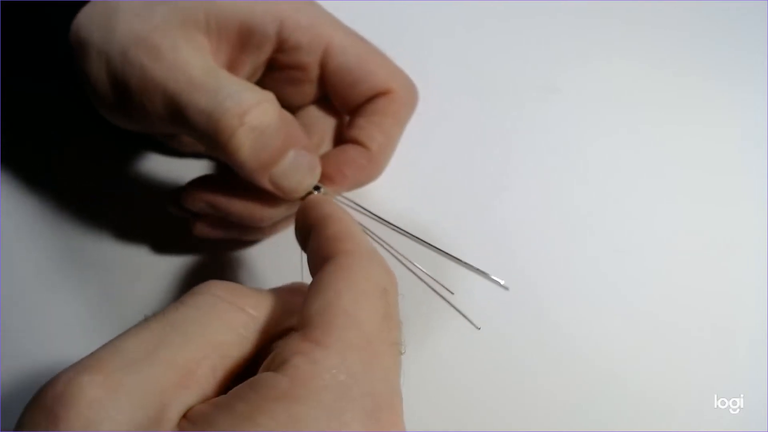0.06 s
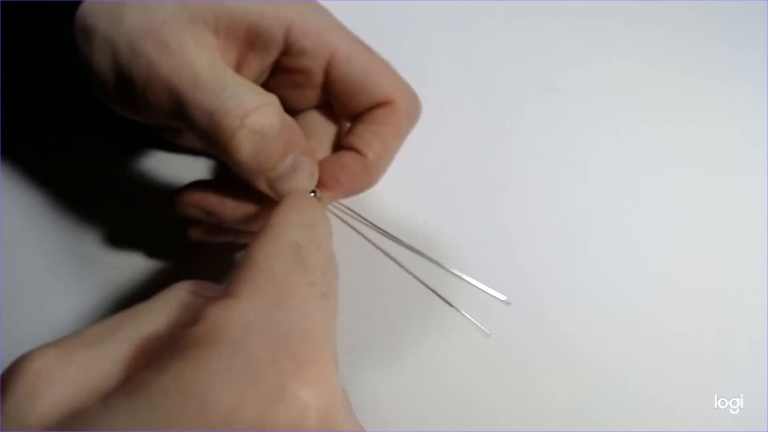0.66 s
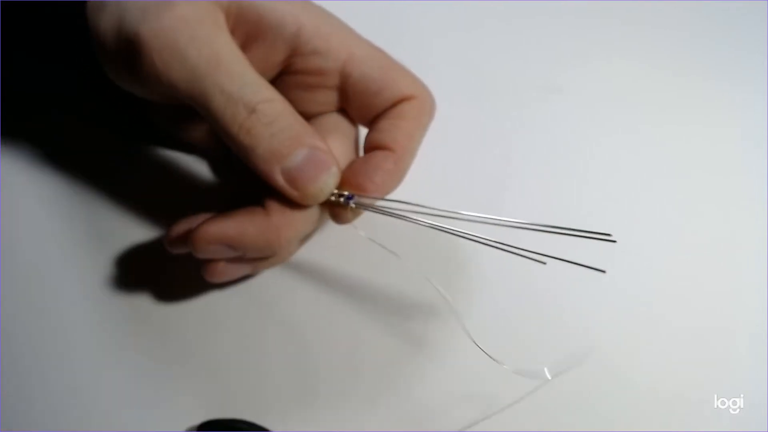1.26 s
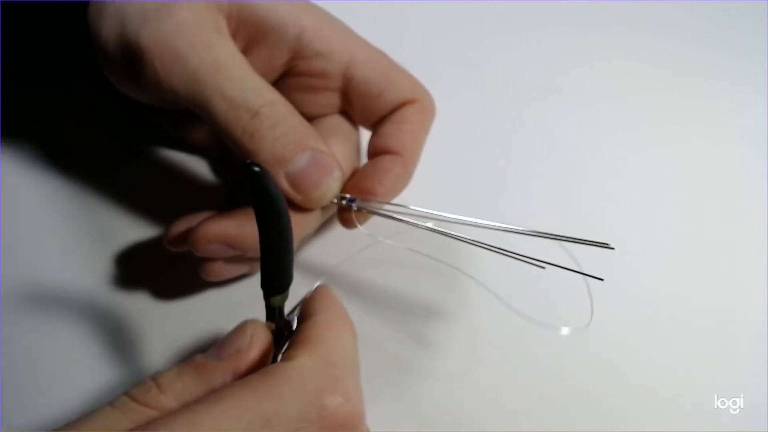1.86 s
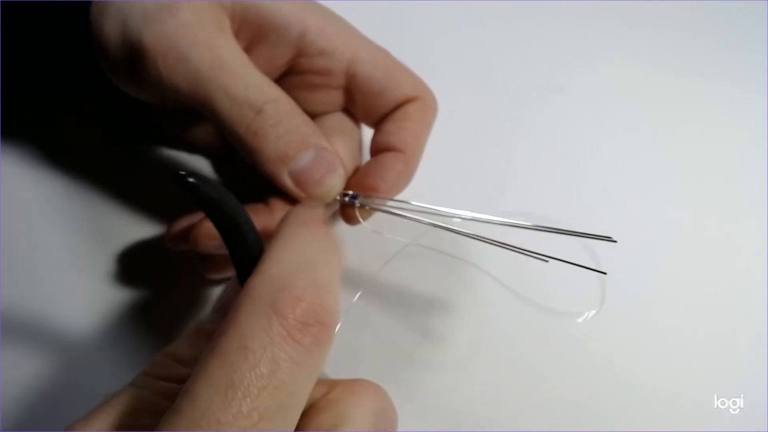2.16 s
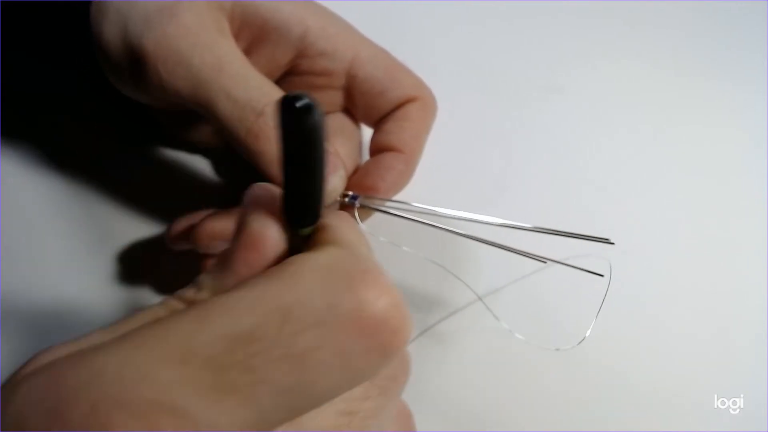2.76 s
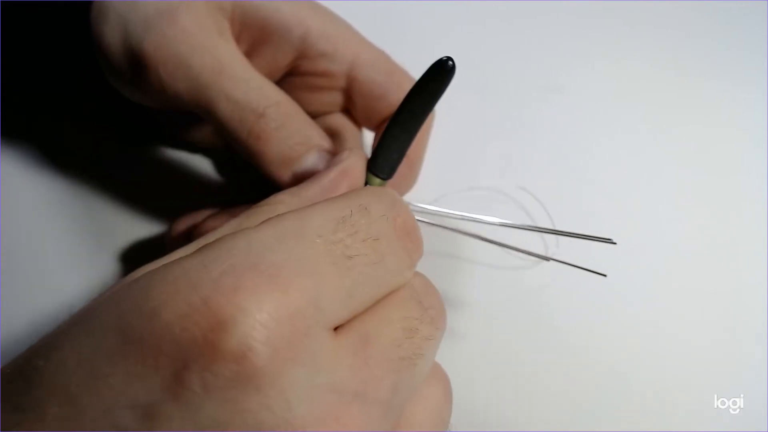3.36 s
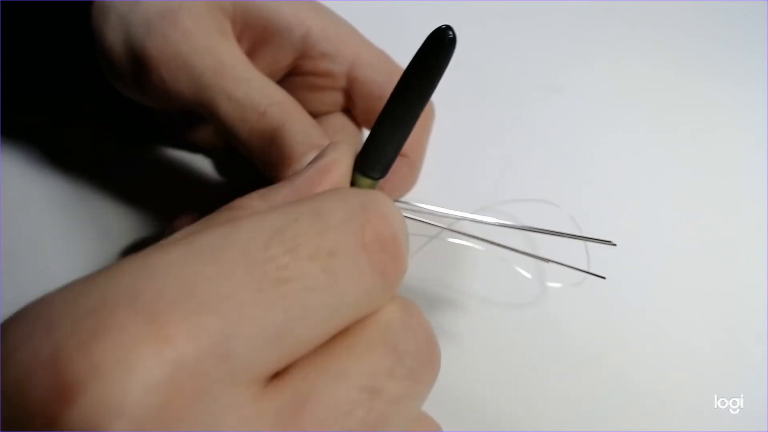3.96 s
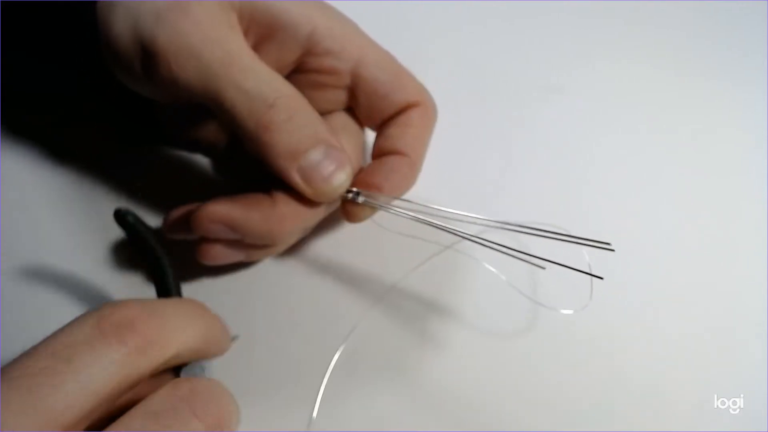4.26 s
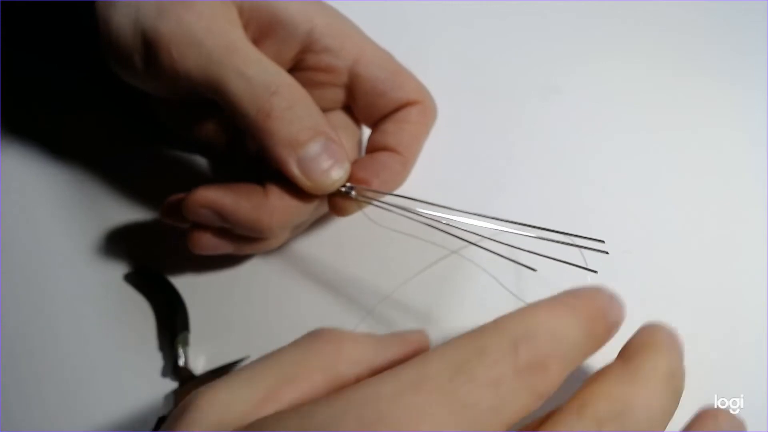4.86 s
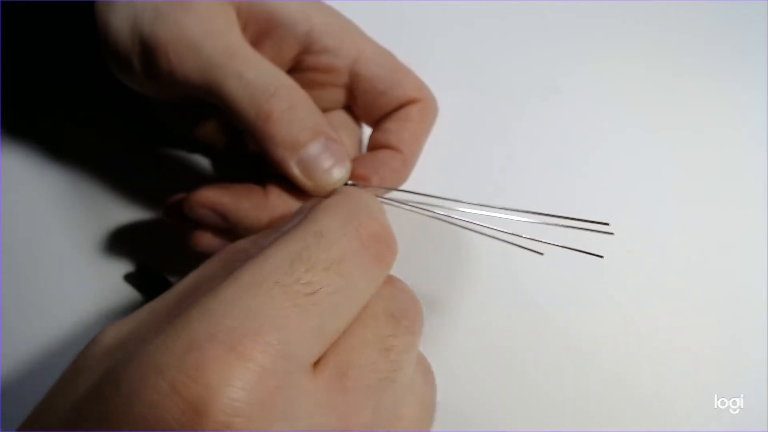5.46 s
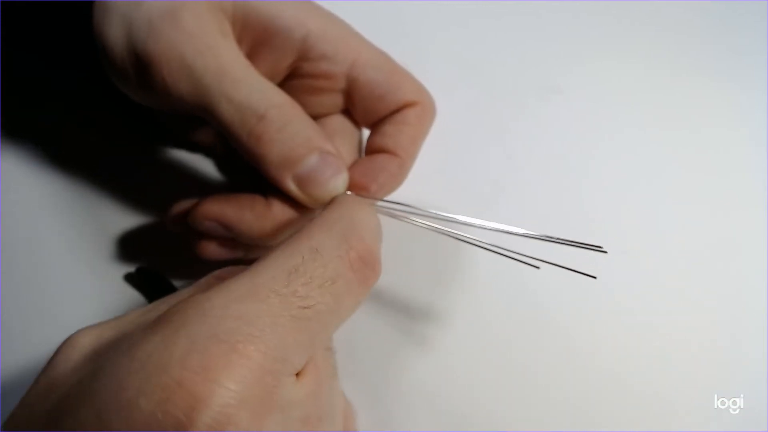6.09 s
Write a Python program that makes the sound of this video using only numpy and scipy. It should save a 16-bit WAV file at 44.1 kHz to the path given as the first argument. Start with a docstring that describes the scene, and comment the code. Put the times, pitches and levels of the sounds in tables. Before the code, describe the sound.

Two microphones sit close to the hands at a desk in a small quiet room, with a low hum and faint air throughout. Thin wire is wrapped around a bundle of stiff wires in short, faint hisses and rasps, with a sharp little metal tick near 0.9 seconds. From about 1.1 to 1.6 seconds small pliers are dragged off the desk with soft bumps, scrapes and tiny squeaks. Around 2.2 seconds a thin squeak and a few clicks lead into the strongest pull of wire, a bright hiss that fades by 2.6 seconds. Fainter strokes come near 3 and 3.8 seconds. A tick and a soft bump at 4.2 seconds precede the loudest sound at 4.4 seconds: the pliers are put down with one sharp knock that briefly rings the desk top. A few more soft strokes of wire follow from 4.8 to 5.4 seconds, then it goes nearly quiet.

```python
"""A desk in a small quiet room, two microphones close to the hands; low hum and faint air throughout.
Thin wire is wrapped round a bundle of stiff wires just above the desk: it hisses through the fingertips,
rasps and ticks against the bundle. Early on, small pliers are dragged off the desk. The strongest pull
of wire comes at 2.3 s. At 4.4 s the pliers are put down with one sharp knock that rings the desk top,
and a few more strokes of wire follow."""
import sys
import numpy as np
from scipy import signal
from scipy.fft import rfft, irfft, next_fast_len
from scipy.io import wavfile

SR = 44100
rng = np.random.default_rng(int(sys.argv[2]) if len(sys.argv) > 2 else 0)


def int16_out(signal):
    """Quantize to a 16-bit WAV file."""
    q = np.round(np.clip(np.atleast_2d(signal).T, -1, 1) * 32767)
    wavfile.write(sys.argv[1], SR, q.astype(np.int16))


N = 274743

# pulls of wire through the fingers:
# (time [s], length [s], hiss level [dB], rasp level [dB], sag by the end [dB], free-length ring [Hz])
WIRE_STROKES = [(0.397, 0.014, -71.5, -82, 0, 7400), (0.61, .05, -89, -86, 0, 3400),
                (0.697, .012, -70, -68, 2, 3400), (0.785, .07, -60.5, -56, 0, 3400),
                (0.874, .022, -52, -54, 11, 6500), (0.933, .012, -59, -64, 0, 6200),
                (1.048, .015, -76, -75, 1, 3200), (1.118, .11, -68.5, -64.5, 7, 3700),
                (1.304, .02, -71, -73.5, 1, 3440), (1.372, .095, -68, -65.5, 6, 2400),
                (1.515, .095, -68, -70.5, 3, 6200), (1.86, .015, -80, -78, -1.5, 3550),
                (1.893, .014, -68.5, -72, 1, 3500), (2.2, 0.032, -59, -59, -1, 3420),
                (2.28, 0.12, -43.5, -50, 4, 6100), (2.425, .185, -52.5, -64, 21, 5580),
                (2.942, .06, -59, -67.5, 2, 5450), (3.035, .095, -66, -78, 2, 5460),
                (3.257, .02, -77.5, -91, 2, 5400), (3.405, .025, -91, -88, 1, 5360),
                (3.67, 0.019, -84, -82.5, 5, 5430), (3.788, .03, -52.5, -62, 3, 5460),
                (3.865, .11, -58, -69.5, 5, 5460), (4.232, .075, -63, -59.5, 14, 3400),
                (4.81, .15, -61, -70.5, -2, 5200), (5.01, .10, -58.5, -69.5, 3, 4900),
                (5.139, 0.11, -55.5, -64, 0, 4790), (5.28, .08, -61, -71.5, 9, 4790),
                (5.494, 0.034, -83, -92, 2.5, 4630), (6.2, .01, -62, -82, 0, 6800)]
# wire on fingertips: (frequency [Hz], level [dB])
HISS_SPECTRUM = [(1300, -29.5), (2400, -16.5), (3200, -3.5), (3700, -1), (4300, -0.5), (4850, -3),
                 (5150, -1.5), (5550, -3), (6500, -5), (7400, -3), (8300, -14), (10000, -14.5),
                 (13000, -18.5), (16000, -27)]
# wire on metal or desk: (frequency [Hz], level [dB])
RASP_SPECTRUM = [(50, -24.5), (150, -11), (400, -7), (800, -10), (1200, -8), (1900, -3), (2500, -5.5),
                 (3100, 2), (4000, -7), (7000, -24.5)]
# the rubbed wire's own ringing: (frequency [Hz], width [Hz], level against the plain hiss [dB])
WIRE_MODES = [(3760, 85, -4.5), (4830, 230, 1.5), (5570, 460, 4.5), (6270, 200, -2), (9485, 300, -3.5)]
# the wire sings where it skids: (time [s], length [s], start pitch [Hz], end pitch [Hz], level [dB])
WIRE_SQUEAKS = [(0.685, 0.035, 1130, 1087, -63), (0.80, 0.047, 3400, 3270, -62),
                (0.985, .045, 3100, 3150, -70.5), (1.29, .04, 3560, 3230, -70),
                (1.37, 0.07, 2200, 2430, -65.5), (1.376, .041, 1080, 1204, -66),
                (1.445, .03, 2300, 2250, -71), (1.496, 0.075, 2607, 1637, -62),
                (1.505, .045, 3300, 2800, -58.5), (2.175, 0.072, 3360, 3460, -53),
                (2.202, .036, 1915, 1730, -54), (2.277, 0.11, 3417, 3420, -60),
                (2.579, 0.043, 3310, 3360, -73.5), (5.014, 0.035, 4900, 4660, -54.5),
                (5.241, 0.038, 3035, 2800, -60.5)]
# metal touching metal: (time [s], level [dB], ring [Hz], chatter t60 [s])
METAL_TICKS = [(0.696, -54.5, 2420, 0.014), (0.7662, -46, 1890, .04), (0.7661, -46, 3110, .024),
               (0.791, -62.5, 2020, 0.014), (0.857, -29.5, 5330, 0.011), (0.928, -46, 2880, .006),
               (1.131, -57.5, 2220, 0.044), (1.356, -58.5, 1910, .02), (1.586, -43.5, 3125, .015),
               (1.5871, -40.5, 6120, .0043), (1.895, -55.5, 3290, .022), (2.189, -43, 3300, 0.011),
               (2.206, -38.5, 2053, .019), (2.2564, -24.5, 4600, .0047), (2.267, -30.5, 4400, .014),
               (2.2687, -36, 1940, .012), (2.376, -49, 1900, 0.028), (4.2217, -33.5, 3500, .0085),
               (4.2598, -43.5, 2200, .011), (4.425, -41, 4650, .008), (5.033, -50, 4960, 0.018)]
# blows on the desk, low cut-off for flesh, high for steel:
# (time [s], level [dB], contact cut-off [Hz], hand damping t60 [s])
DESK_BLOWS = [(0.696, -51, 700, 0.63), (0.768, -43.5, 810, 0.22), (1.1107, -36, 200, 0.14),
              (1.119, -35, 100, 0.11), (1.132, -30, 85, 0.17), (1.206, -50, 355, .3),
              (1.358, -50.5, 400, 0.24), (1.373, -46.5, 250, 0.37), (1.392, -46, 160, 0.4),
              (1.445, -51, 157, .3), (2.256, -47, 601, .2), (4.2238, -31, 150, .6), (4.233, -44.5, 130, .3),
              (4.261, -38, 180, 0.42), (4.4279, -26, 900, .3), (4.4333, -6.5, 2400, 1.8),
              (4.89, -56, 300, .4)]
# what the desk top rings with: (frequency [Hz], level [dB], t60 [s])
DESK_MODES = [(80, -18.5, 0.49), (126, -6.5, 0.18), (165.4, -8, 0.16), (191.8, -8.5, 0.17),
              (209, -9.5, 0.36), (264, -8.5, 0.091), (350, -0.5, 0.049), (385, 0, 0.022), (405, -11.5, .18),
              (538, -12.5, 0.051), (624, -12, 0.19), (804, -13.5, 0.18), (855, -8, .18), (964, -6.5, 0.019),
              (1075, -14, 0.083), (1338, -11, 0.069), (1400, -2.5, 0.067), (1610, -9.5, 0.077),
              (1740, -0.5, 0.043), (1950, -10.5, 0.032), (2440, -13, .025)]
# the clatter inside a blow: (frequency [Hz], level [dB])
CLATTER_SPECTRUM = [(60, -10.5), (300, -5.5), (1000, 1), (1900, 0), (2800, -12.5), (5000, -19),
                    (12000, -20.5)]
# the rush of noise round the sharp knock: (frequency [Hz], level [dB])
KNOCK_RUSH_SPECTRUM = [(50, -19), (150, 1.5), (600, 4), (1500, -0.5), (3000, 2.5), (4800, -6),
                       (7500, -13.5), (11000, -18), (15500, -20)]
# the hands press and shift: (time [s], length [s], level [dB])
HAND_BUMPS = [(0.853, .025, -48), (3.108, .02, -56)]
# bounces off desk, hands and screen: (left delay [s], right delay [s], level [dB])
NEAR_REFLECTIONS = [(.0008, .00045, -19), (.0017, .0023, -17.5), (.0041, .0034, -11), (.0056, .0066, -11),
                    (0.014, .0128, -14)]
# the room's echo: (frequency [Hz], level [dB])
ECHO_SPECTRUM = [(50, -15), (200, -9.5), (400, -11), (900, -10.5), (1500, -11.5), (3000, -12.5),
                 (6000, -12), (15000, -14)]
# faint air noise: (frequency [Hz], level [dB])
AIR_SPECTRUM = [(20, -9.5), (50, -4.5), (90, -18), (220, -12.5), (290, -29), (430, -27), (575, -23.5),
                (720, -30), (1200, -34.5), (1800, -44), (3000, -48), (7000, -49.5), (9000, -56.5),
                (16000, -61.5)]
# resonances of the low drone: (frequency [Hz], width [Hz], level [dB])
DRONE_BANDS = [(77.2, 8.5, -16), (134, 8, -9.5), (167.6, 20, 7.5), (222, 23, 4), (250, 9.3, -13.5)]
# soft swells of the drone: (time [s], level [dB])
DRONE_SWELLS = [(0.75, -63), (1.97, -59.5), (2.28, -62), (3.115, -65), (3.27, -61), (4.02, -61),
                (4.791, -58.5), (5.05, -61), (5.615, -61)]
# likeness of the two microphones: (frequency [Hz], correlation [0-1])
MIC_CORRELATION = [(60, 0.93), (300, 0.57), (700, 0.32), (1400, 0.46), (3000, 0.17), (15000, 0.089)]


def sliding_wire(hiss_db, rasp_db):
    """Wire hisses and rings through the fingers, and rasps lower over metal or desk."""
    rubbing = friction(HISS_SPECTRUM, slips_per_s=1200, spread_db=5.6, smooth=0.35)
    ringing = sum(from_db(db) * resonance(rubbing, hz, width) for hz, width, db in WIRE_MODES)
    singing = rms_one(rubbing + ringing)
    rasp = friction(RASP_SPECTRUM, slips_per_s=540, spread_db=5.0, smooth=0.45)
    out = np.zeros((2, N))
    for s, length, bright_db, low_db, sag_db, ring_hz in WIRE_STROKES:
        hiss = singing + from_db(2.0) * resonance(rubbing, ring_hz, width_hz=260)
        speed = gesture(s, length, rise_db_per_s=560, fall_db_per_s=480, sag_db=sag_db)
        out += speed * (from_db(hiss_db + bright_db) * hiss + from_db(rasp_db + low_db) * rasp)
    uneven_grip = from_db(1.1 * wander(hz=20))
    return out * uneven_grip


def wire_squeaks(level_db, roughness):
    """Narrow scraping resonances glide as the free length of wire changes."""
    out = np.zeros((2, N))
    for s, length, start_hz, end_hz, db in WIRE_SQUEAKS:
        n, width_hz = int(length * SR), 0.042 * start_hz
        phase = 2 * np.pi * np.cumsum(np.linspace(start_hz, end_hz, n)) / SR
        scrape = rng.standard_normal((2, 2, n + SR // 10))
        core = rms_one(low_pass(scrape, width_hz))
        skirt = rms_one(low_pass(scrape[..., ::-1], 4 * width_hz))  # uneven slipping widens the note
        cos_gain, sin_gain = (core + roughness * skirt)[..., -n:]
        note = rms_one(cos_gain * np.cos(phase) + sin_gain * np.sin(phase))
        add(out, from_db(db + level_db) * np.sin(np.linspace(0, np.pi, n)) * note, s)
    return out


def metal_ticks(level_db, crack_db, ping_db):
    """Each tick is a ping of wire or pliers with a brief chatter of metal on metal."""
    out, t = np.zeros((2, N)), np.arange(SR // 10) / SR
    crack_band = signal.butter(1, [900, 7000], "band", fs=SR, output="sos")
    for s, db, hz, t60 in METAL_TICKS:
        fade = from_db(-60 * t / t60)
        chatter = rng.standard_normal((2, len(t))) * fade
        ring = rms_one(resonance(chatter, hz, width_hz=0.27 * hz))
        crack = from_db(crack_db) * rms_one(signal.sosfilt(crack_band, chatter))
        ping = from_db(ping_db) * rms_one(np.sin(2 * np.pi * hz * t) * fade ** 2)
        tick = rms_one(ring + crack + ping) * np.sqrt(np.mean(fade ** 2))
        add(out, from_db(db + level_db) * tick, s)
    return low_pass(out, hz=11300)


def desk_knocks(clatter_db, clatter_t60_s, mic_offset_s, right_db):
    """Each blow rings the desk's modes with a short clatter; a soft contact takes the top off."""
    out, t = np.zeros((2, N)), np.arange(SR // 2) / SR
    mics, modes = np.array([[-1], [1]]), 0
    attack = np.minimum(t / 0.00054, 1)
    for k, (hz, db, t60) in enumerate(DESK_MODES):
        # higher modes radiate unevenly: they reach the microphones out of step, stronger on the right
        side_db = mics * right_db * min(hz / 1400, 1) ** 2
        swing = np.cos(2 * np.pi * hz * (t + mics * mic_offset_s * (-1) ** (k // 2)))
        # low modes push the whole board one way; higher neighbours start in opposite directions
        direction = 1 if hz < 470 else (-1) ** k
        modes = modes + direction * from_db(db + side_db - 60 * t / t60) * swing * attack
    clatter_fade = from_db(clatter_db - 60 * t / clatter_t60_s)
    for s, db, contact_hz, damping_t60 in DESK_BLOWS:
        clatter = stereo_noise(len(t), CLATTER_SPECTRUM) * clatter_fade
        knock = low_pass(modes + clatter, contact_hz) / np.abs(low_pass(modes, contact_hz)).max()
        add(out, knock * from_db(db - 60 * t / damping_t60), s)
    return signal.sosfilt(signal.butter(2, 64.8, "high", fs=SR, output="sos"), out)


def knock_rush(s, level_db):
    """A brief rush of noise swells into the sharp knock and dies away."""
    noise = friction(KNOCK_RUSH_SPECTRUM, slips_per_s=700, spread_db=1.0, smooth=1.0)
    return from_db(level_db) * gesture(s, 0, rise_db_per_s=850, fall_db_per_s=480) * noise


def hand_bumps():
    """Soft pushes of the hands, felt more than heard."""
    push = sum(from_db(db) * gesture(s, length, rise_db_per_s=554.5, fall_db_per_s=292)
               for s, length, db in HAND_BUMPS)
    return push * wander(hz=36)


def near_surfaces(x):
    """A few early reflections comb the sound, differently at each microphone."""
    out = x.copy()
    for left_s, right_s, db in NEAR_REFLECTIONS:
        add(out[0], from_db(db) * x[0], left_s)
        add(out[1], from_db(db) * x[1], right_s)
    return out


def room_echo(x, first_echo_s, t60_s):
    """Dense reflections from near walls build up in a few milliseconds and die quickly."""
    t = np.arange(SR // 2) / SR
    fade = from_db(-60 * t / t60_s) * np.clip(t / first_echo_s - 1, 0, 1)
    response = stereo_noise(len(t), ECHO_SPECTRUM) * fade / np.sqrt(np.sum(fade ** 2))
    return signal.fftconvolve(x, response, axes=1)[:, :N]


def room_tone(air_db, drone_db, hum_db):
    """Faint air noise, with a softly swelling drone and a deep hum alike at both microphones."""
    air = rms_one(stereo_noise(N, AIR_SPECTRUM))
    drone = rms_one(sum(from_db(db) * narrow_noise(hz, width) for hz, width, db in DRONE_BANDS))
    swells = sum(from_db(db) * gesture(s, 0, rise_db_per_s=240, fall_db_per_s=240)
                 for s, db in DRONE_SWELLS)
    hum = narrow_noise(hz=42, width_hz=4.3)
    return from_db(air_db) * air + (from_db(drone_db) + swells) * drone + from_db(hum_db) * hum


def friction(spectrum, slips_per_s, spread_db, smooth):
    """Tiny stick-slip snaps of uneven size, each a few milliseconds long, over smooth rubbing noise."""
    sizes = from_db(spread_db * np.minimum(rng.exponential(1, N), 4))
    slips = (rng.random(N) < slips_per_s / SR) * sizes
    force = signal.lfilter([1], [1, -np.exp(-1 / (0.0025 * SR))], slips + 1e-18)
    return rms_one(stereo_noise(N, spectrum, envelope=rms_one(force) + smooth))


def gesture(s, length, rise_db_per_s, fall_db_per_s, sag_db=0):
    """Gain that rises to 1 at a time, sags while it is held, then dies away."""
    t = np.arange(N) / SR - s
    held = np.clip(t / max(length, 1e-6), 0, 1)
    db = rise_db_per_s * np.minimum(t, 0) - sag_db * held - fall_db_per_s * np.maximum(t - length, 0)
    return from_db(np.maximum(db, -200))


def stereo_noise(n, spectrum, envelope=1):
    """Noise at the two microphones: alike in the bass, shaped by a spectrum."""
    size = next_fast_len(n)
    hz = np.fft.rfftfreq(size, 1 / SR)
    mid, side = rfft(rng.standard_normal((2, n)) * envelope, size)
    alike = np.clip(at_hz(MIC_CORRELATION, hz), 0, 1)
    mid, side = mid * np.sqrt((1 + alike) / 2), side * np.sqrt((1 - alike) / 2)
    return irfft(np.array([mid + side, mid - side]) * from_db(at_hz(spectrum, hz)), size)[:, :n]


def narrow_noise(hz, width_hz):
    """A wavering tone: noise twice through one resonance."""
    band = resonance(rng.standard_normal(N + SR), hz, 2 * width_hz)
    return rms_one(resonance(band, hz, 2 * width_hz)[SR:])


def wander(hz):
    """Slow random drift with spread 1."""
    return rms_one(low_pass(rng.standard_normal(N + SR), hz)[SR:])


def resonance(x, hz, width_hz):
    """Two-pole band-pass with gain 1 on top."""
    r = np.exp(-np.pi * width_hz / SR)
    feedback = [1, -2 * r * np.cos(2 * np.pi * hz / SR), r * r]
    return signal.lfilter(np.array([1, 0, -1]) * (1 - r * r) / 2, feedback, x)


def low_pass(x, hz):
    """Gentle second-order low-pass."""
    return signal.sosfilt(signal.butter(2, hz, fs=SR, output="sos"), x)


def at_hz(points, hz):
    """Read a spectrum on a log-frequency axis."""
    points = np.array(points)
    return np.interp(np.log(hz + 1e-3), np.log(points[:, 0]), points[:, 1])


def add(track, sound, s):
    """Mix a sound in at a time."""
    start = int(round(s * SR))
    track[..., start:start + sound.shape[-1]] += sound[..., :N - start]


def from_db(db):
    """Decibels to gain."""
    return 10 ** (np.asarray(db) / 20)


def rms_one(x):
    """Scale to rms 1."""
    return x / np.sqrt(np.mean(x ** 2) + 1e-20)


def scene():
    """Wire and pliers close up, the wire slightly to the left; the room's echo and tone behind."""
    slide = sliding_wire(hiss_db=-3.2, rasp_db=-0.3)
    wire = near_surfaces(slide + wire_squeaks(level_db=2.0, roughness=0.66))
    rush = near_surfaces(knock_rush(s=4.436, level_db=-33.5))
    ticks = near_surfaces(metal_ticks(level_db=0.5, crack_db=-16.0, ping_db=1.0))
    knocks = desk_knocks(clatter_db=10.5, clatter_t60_s=0.06, mic_offset_s=0.00008, right_db=1.0)
    lean_left = from_db([[0.54], [-0.54]])
    close = (wire + ticks) * lean_left + rush + knocks
    to_walls = from_db(-10) * wire + from_db(-6) * ticks + from_db(5) * rush + from_db(1) * knocks
    echo = room_echo(to_walls, first_echo_s=0.0046, t60_s=0.28)
    return close + echo + hand_bumps() + room_tone(air_db=-68, drone_db=-71, hum_db=-68)


def record(dry):
    """Both channels are cut steeply above 15.9 kHz."""
    return signal.sosfilt(signal.ellip(10, 0.1, 70, 15900, fs=SR, output="sos"), dry)


dry = scene()
out = record(dry)
int16_out(out)
```